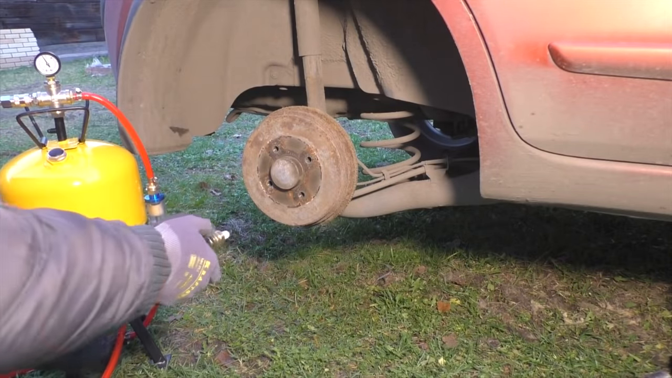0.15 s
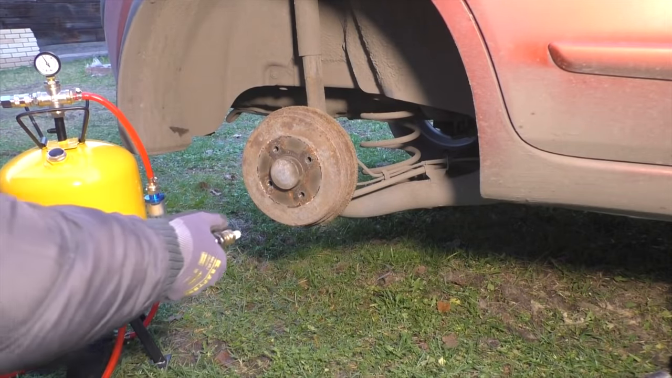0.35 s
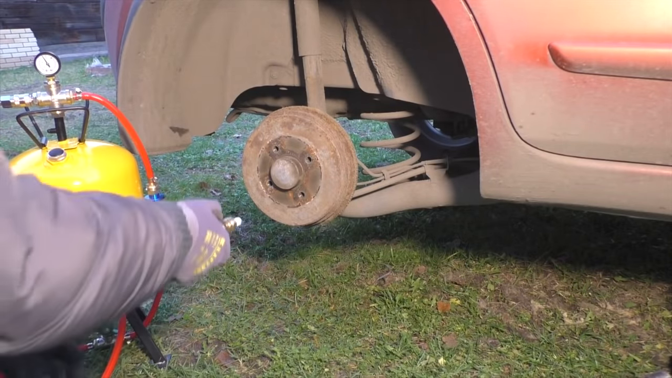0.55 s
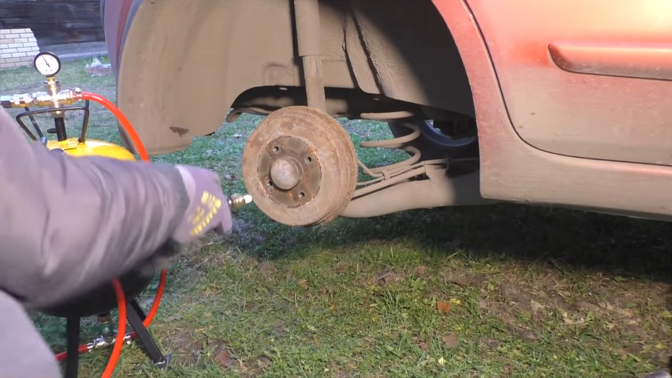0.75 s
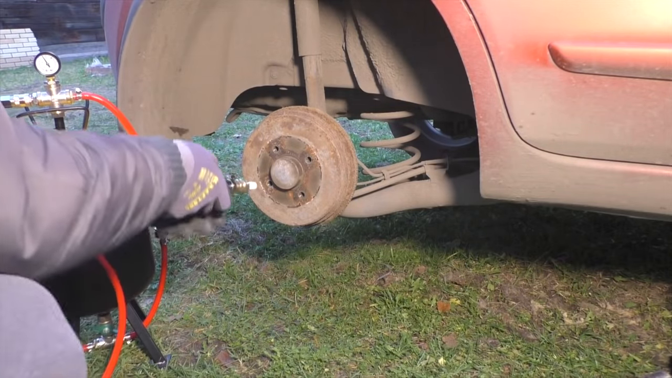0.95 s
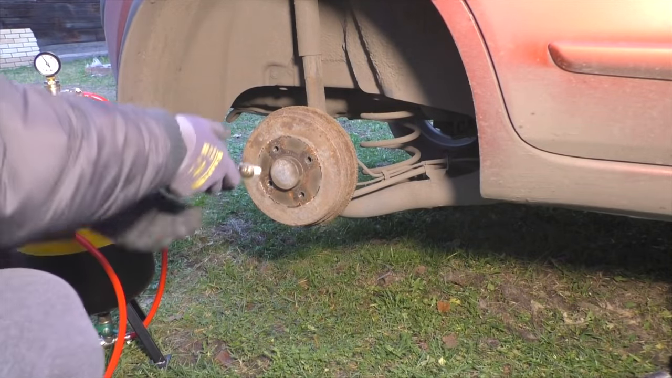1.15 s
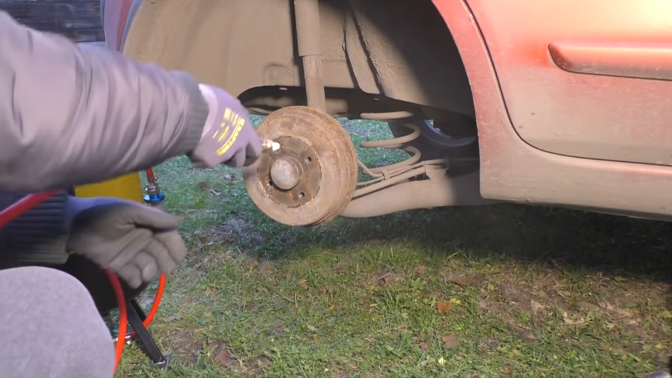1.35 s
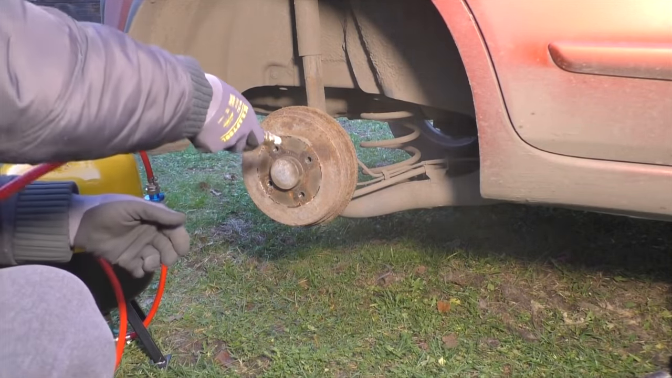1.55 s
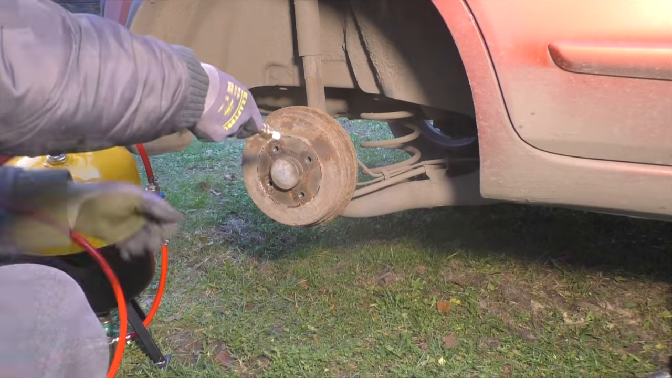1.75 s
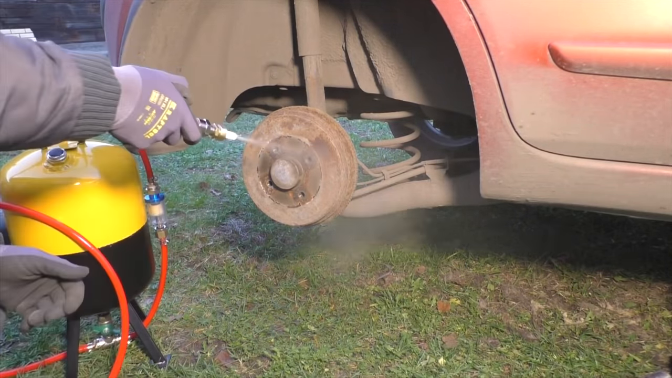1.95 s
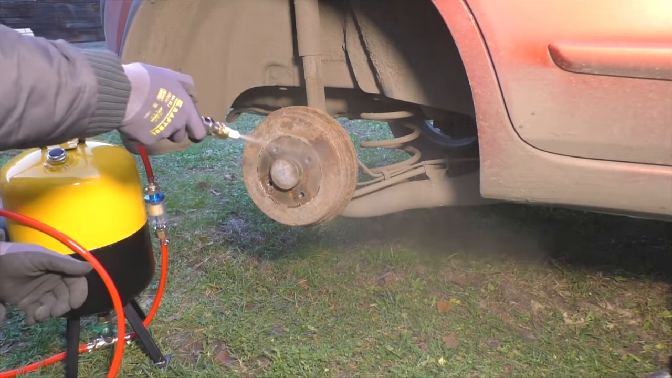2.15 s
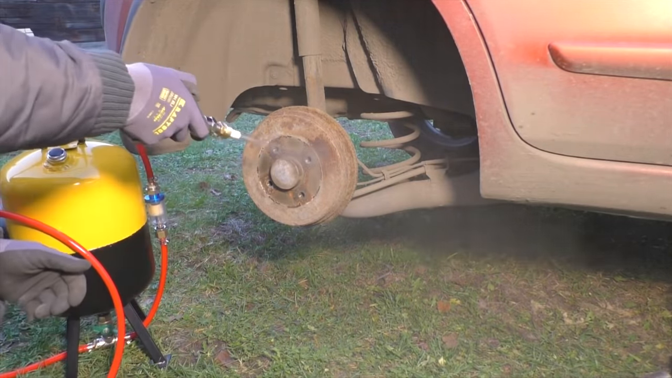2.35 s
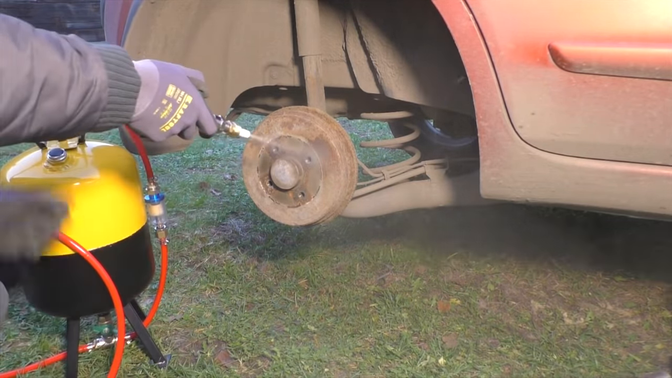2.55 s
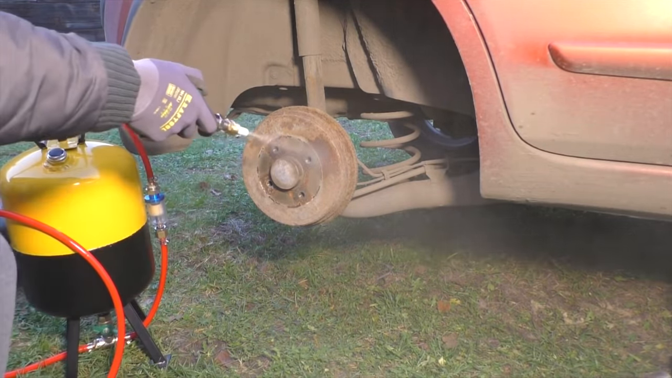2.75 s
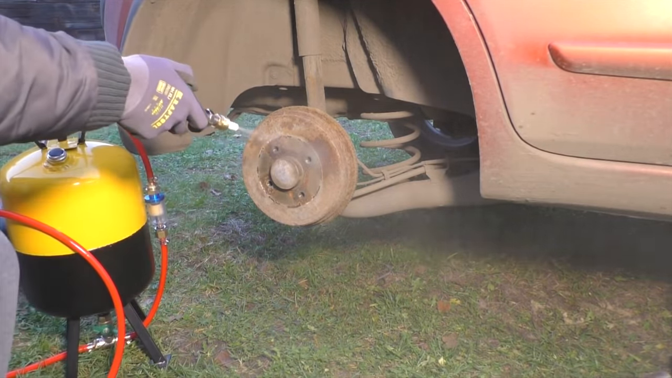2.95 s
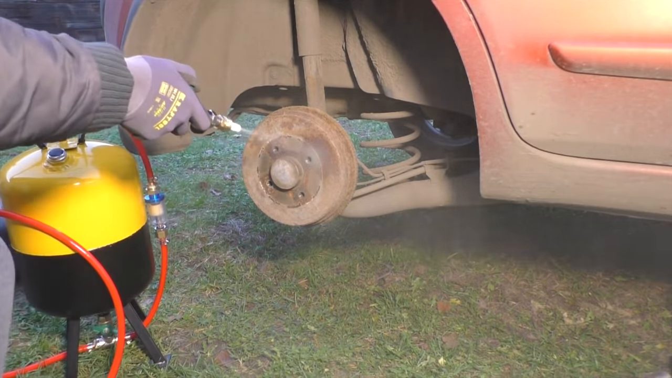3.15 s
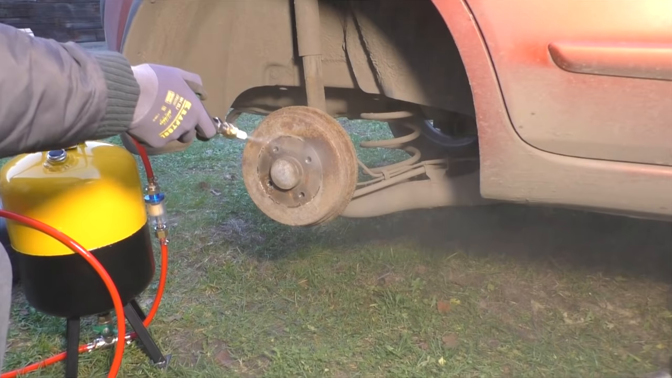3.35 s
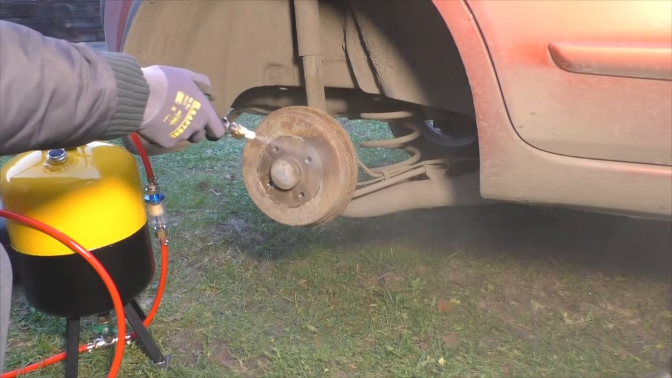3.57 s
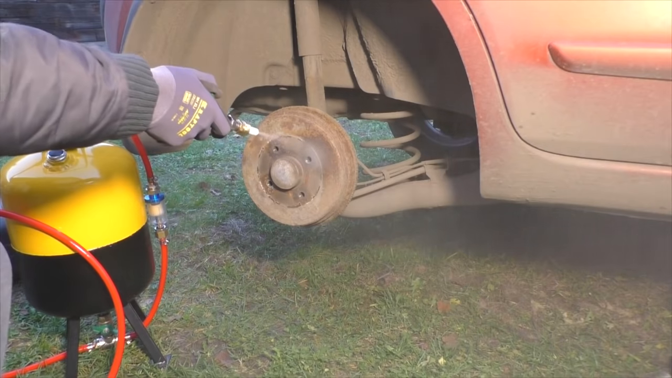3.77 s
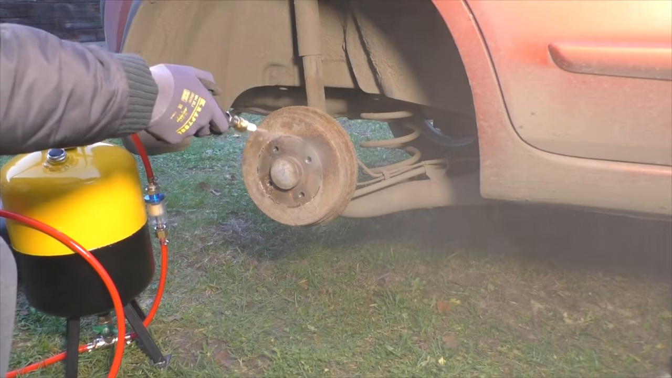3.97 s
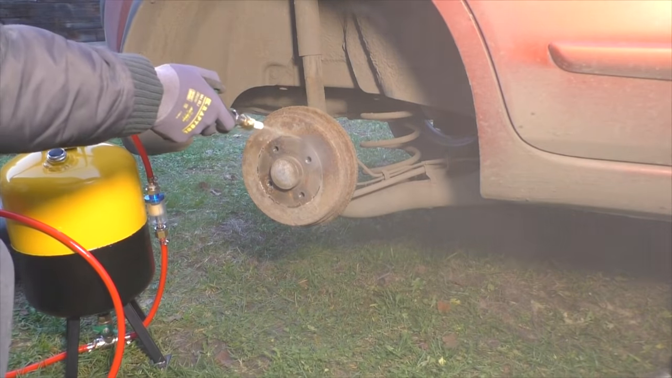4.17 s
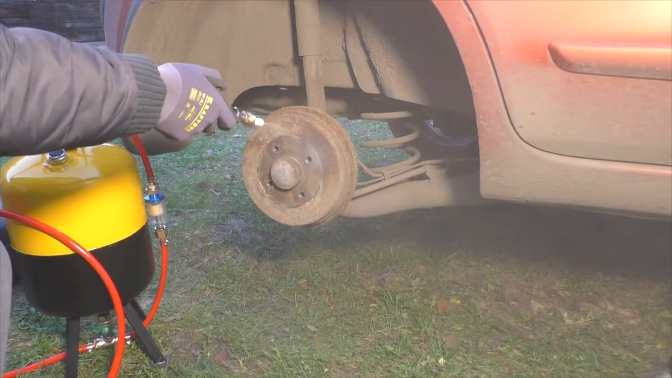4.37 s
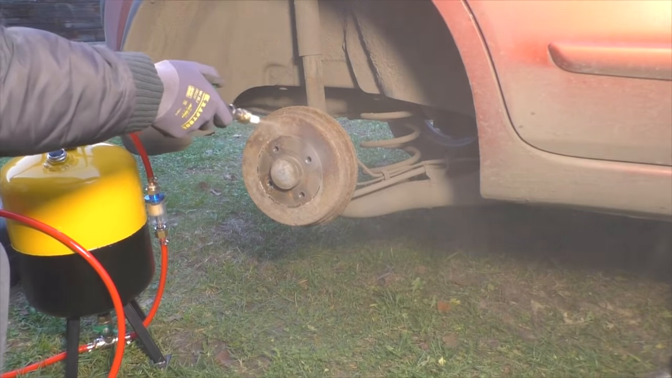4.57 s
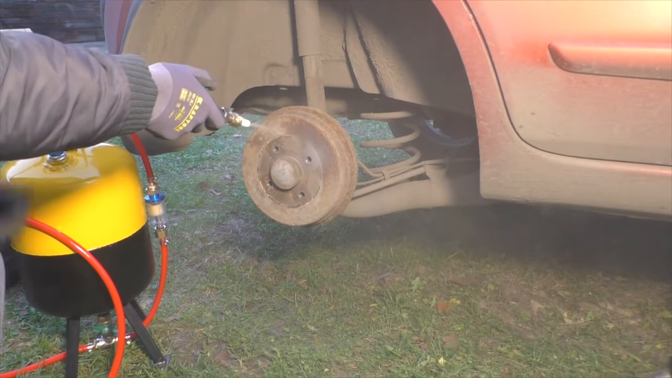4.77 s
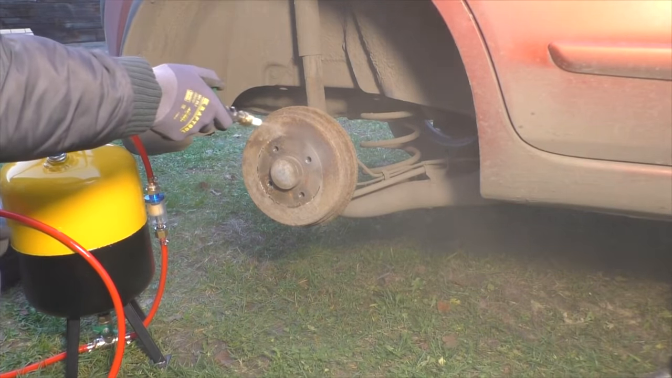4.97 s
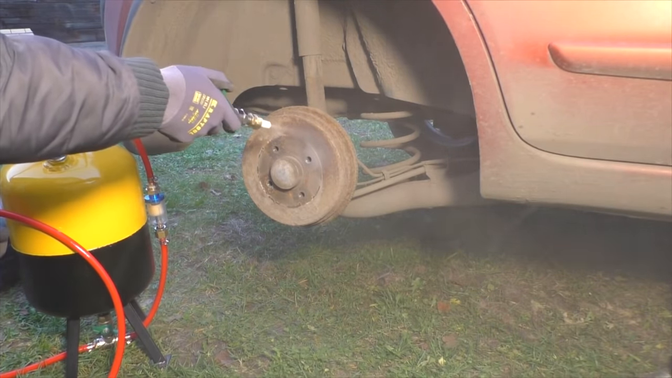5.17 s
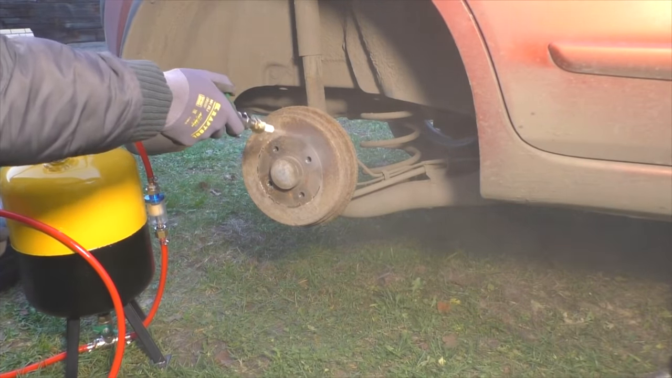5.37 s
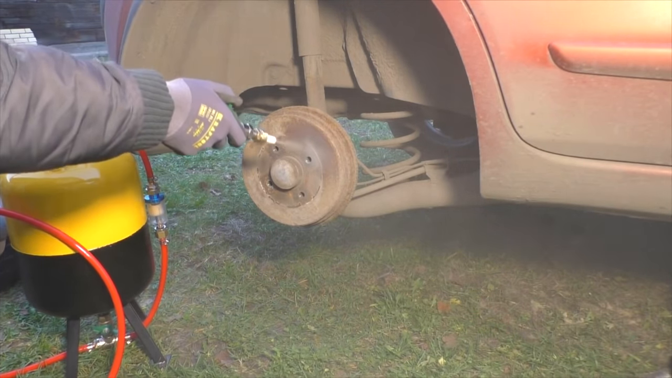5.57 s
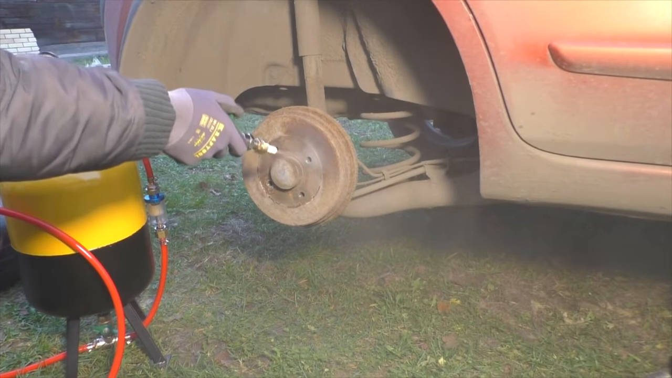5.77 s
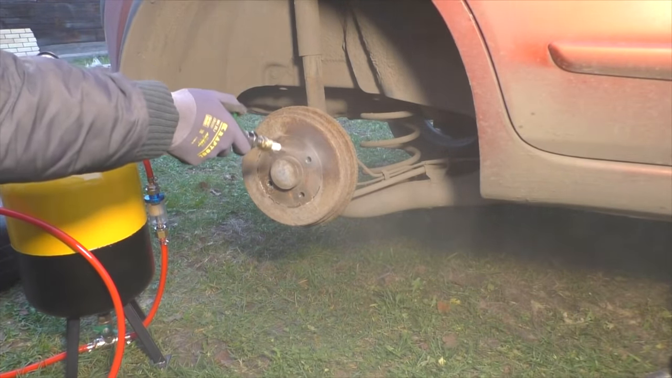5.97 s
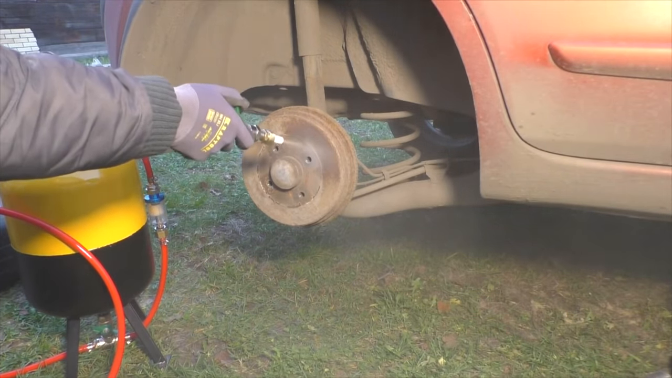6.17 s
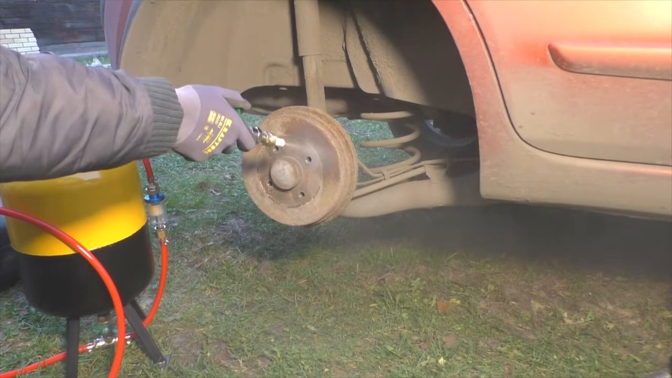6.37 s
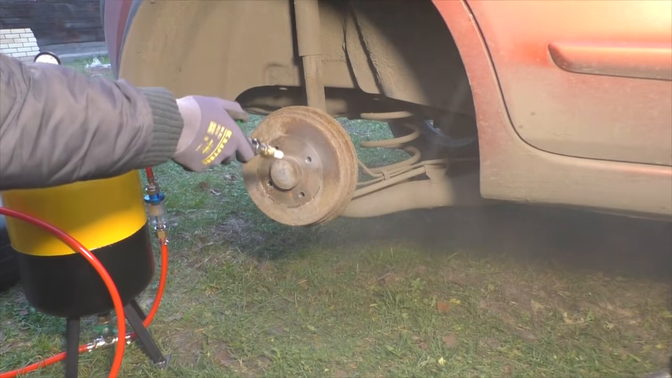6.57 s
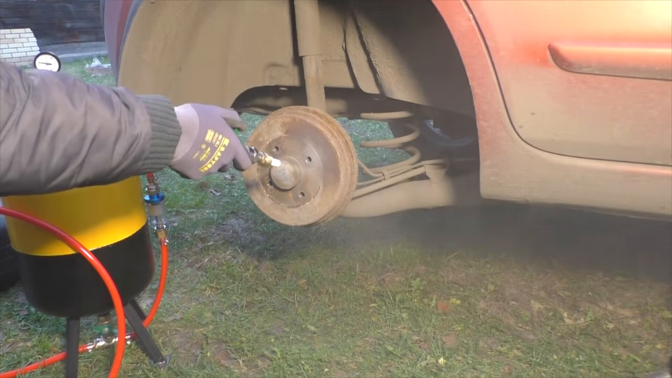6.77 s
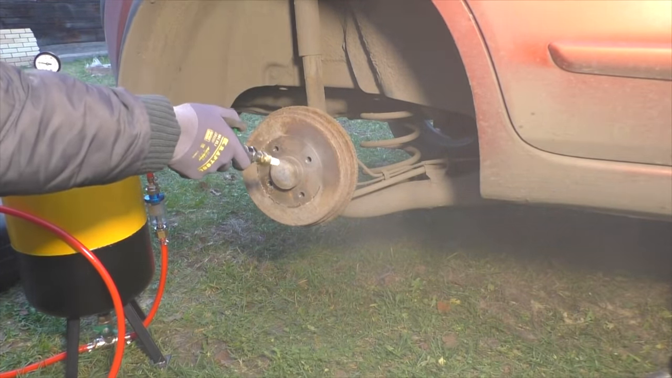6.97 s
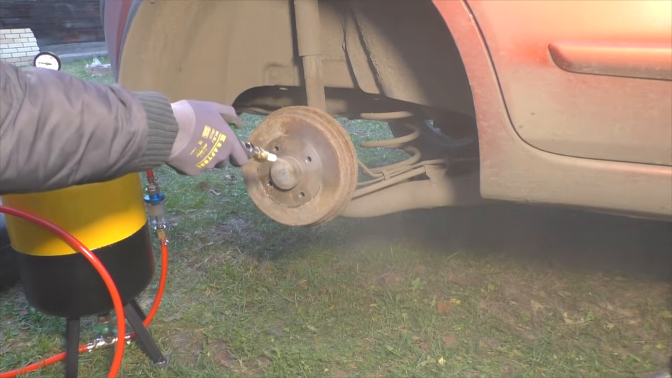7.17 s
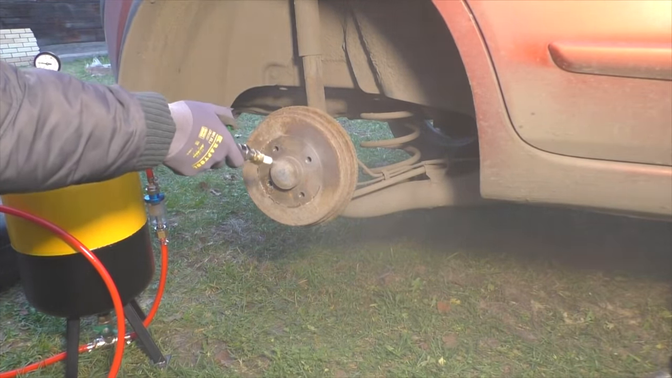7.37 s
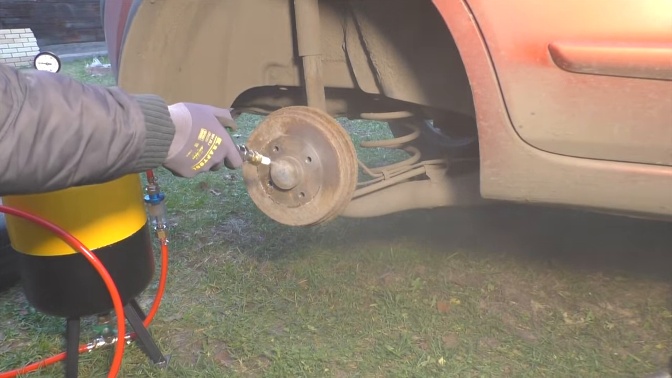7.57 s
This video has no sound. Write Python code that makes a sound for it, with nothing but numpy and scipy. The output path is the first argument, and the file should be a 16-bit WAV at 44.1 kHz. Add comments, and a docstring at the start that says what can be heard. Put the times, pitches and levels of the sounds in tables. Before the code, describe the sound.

Outdoors, close to a car's wheel arch, in stereo. From 0 to 0.87 s it is quiet: a faint steady machine whine around 2 kHz, murmuring air, low rumble, a tiny hiss puff at the start and a small tick near 0.44 s. At about 0.9 s the valve opens with an abrupt loud rush and very short squeals. From 1.0 to 1.7 s nearly bare air shrieks at a piercing 14 to 15 kHz, with brief breaks, sagging and fraying into hiss. Around 1.8 to 2.0 s sand chokes the hose: the blast drops sharply and splutters hollowly. It bursts clear at 2.03 s. Until 7.6 s a dense, gritty hiss and midrange roar flow steadily but unevenly, grains sizzling on the drum, whose metallic ringing strengthens after 4 s. Soft low booms buffet the arch; a small gust swells near 7.3 s. The blast never stops.

```python
"""Outdoors, close to a car's wheel arch: a hand-held sandblaster strips a brake drum before a two-port microphone.
A machine whines faintly over a murmur of air until the valve opens with a rush and short squeals.
Nearly bare air then shrieks at the nozzle as one fraying tone, until a slug of sand chokes the hose.
Once it clears, sand and air hiss on the ringing drum to the end, while the wheel arch booms below.
Filtered noise makes jet, air and resonances; random ticks make the grains; sines make whine and shriek."""
import sys
import numpy as np
from scipy import signal
from scipy.fft import rfft, irfft, next_fast_len
from scipy.io import wavfile
from scipy.ndimage import uniform_filter1d, map_coordinates

SR = 44100
rng = np.random.default_rng(int(sys.argv[2]) if len(sys.argv) > 2 else 0)


def inscribe(sig):
    """Save sig as 16-bit PCM at rate SR to the path in sys.argv[1].

    A 1-D sig is mono; a 2-D sig holds one channel per row.
    Samples are clipped to [-1, 1] before scaling.
    """
    pcm = np.round(np.clip(np.atleast_2d(sig).T, -1, 1) * 32767)
    wavfile.write(sys.argv[1], SR, pcm.astype(np.int16))


N = 336483

# spectrum of the sand's sizzle: f/Hz, relative level/dB
SAND_SPECTRUM = [(4000, -31), (7300, -18), (8400, -4.5), (9600, 0.5), (11500, 0), (12900, -2), (13500, -10),
                 (16000, -12.5)]
# spectrum of the top treble: f/Hz, relative level/dB
FIZZ_SPECTRUM = [(9000, -41), (12000, 0), (13300, -2.5), (14200, 3), (15000, 0), (15800, -1)]
# spectrum of the low rumble and draught: f/Hz, relative level/dB
RUMBLE_SPECTRUM = [(20, -28), (38, -21), (52, 1), (130, 2.5), (170, -3), (230, -6.5), (450, -10.5),
                   (900, -19), (3000, -38)]
# top treble made at the nozzle: t/s, relative level/dB
TREBLE_LEVEL = [(0.91, -26), (0.94, -26), (1.0, -20.5), (1.3, -22), (1.32, -21), (1.36, -18.5), (1.47, -23),
                (1.77, -24.5), (1.81, -37), (1.97, -41), (2.01, -26), (2.16, -20), (2.26, -30),
                (2.39, -20.5), (2.54, -20), (2.59, -27.5), (3.44, -23), (3.64, -30), (3.72, -22.5),
                (4.2, -29.5), (4.35, -27.5), (7.63, -33.5)]
# gusts as a slug clears or the jet catches an edge: t/s, length/s, rise of the roar/dB
ROAR_GUSTS = [(1.36, 0.055, 4), (1.72, 0.16, 2.5), (1.93, 0.096, 11), (2.028, 0.052, 9.5), (2.31, 0.092, 5),
              (2.73, 0.17, 2.5), (7.28, .08, 4.5)]
# how squarely the jet strikes the drum's face: t/s, relative ring level/dB
FACE_LEVEL = [(0.9, -72), (1.55, -38.5), (2.2, -61), (3.3, -65), (4.2, -42.5), (6.6, -39), (7.63, -40.5)]
# likeness of sound from all around at the two microphone ports: f/Hz, likeness (0 to 1)
DIFFUSE_LIKENESS = [(60, 0.91), (150, .7), (350, 0.14), (900, 0.22), (2000, 0.71), (3000, 0.63), (4500, .5),
                    (6000, .25), (9000, .8), (15000, 0.95)]

OPEN_S, OPENING_S = 0.875, 0.034  # the valve starts to open, and takes this long
PLUG_S, CLEAR_S = 1.82, 2.03  # sand plugs the hose, then it clears


def blast():
    """The turbulent jet roars and rings the drum; clumps of sand sizzle on it, and the feed drives them."""
    # flow of sand onto the drum: t/s, sizzle level/dB
    feed = [(0.91, -33), (0.96, -20.5), (1.02, -31), (1.53, -35), (1.77, -29.5), (1.88, -39.5),
            (1.97, -42.5), (2.01, -23.5), (2.05, -25), (2.26, -29.5), (2.37, -23.5), (2.41, -28.5),
            (2.61, -29), (2.72, -24.5), (2.78, -27.5), (2.93, -25), (3.51, -27.5), (3.58, -31.5),
            (3.74, -24), (3.79, -28), (4.03, -27), (4.17, -29.5), (4.35, -26), (6.65, -27), (6.79, -30.5),
            (6.92, -26), (6.97, -32), (7.07, -24), (7.2, -29.5), (7.37, -25), (7.55, -32), (7.63, -29)]
    # turbulent roar of the jet: f/Hz, relative level/dB
    roar_spectrum = [(60, -41), (200, -14), (420, -11), (600, -8.5), (800, -7), (920, -8), (1150, -2.5),
                     (1600, -6), (2000, -1.5), (2700, -1.5), (4000, -2.5), (7000, -27.5)]
    # hiss of the air: f/Hz, relative level/dB
    air_spectrum = [(300, -31), (1500, -12), (3000, -2), (4200, 0.5), (6300, 1.5), (7400, -0.5),
                    (9000, -0.5), (12000, -27), (16000, -43)]
    # resonances of the drum under the grains: f/Hz, width/Hz, relative level/dB
    drum_modes = [(1270, 100, -5.5), (1430, 99, -2.5), (1653, 51, -3.5), (1873, 50, 1), (2180, 36, -1),
                  (2440, 200, -0.5), (3310, 450, -2.5), (5820, 360, -3)]
    # resonances of the drum's face: f/Hz, width/Hz, relative level/dB
    face_modes = [(740, 130, -5.5), (2100, 96, 4.5), (3255, 80, 5.5), (3470, 100, 6), (5660, 240, 3),
                  (9680, 140, -1), (12000, 180, -10), (12950, 200, 2.5)]

    feed_db = curves(feed)[0] + 27  # relative to a reference sizzle of -27 dB
    gust_db = swells(ROAR_GUSTS)
    ring_db = curves(FACE_LEVEL)[0]
    # the roar starts 6 dB weaker and fills out in 0.79 s
    build_db = -6 * (1 - ramp(OPEN_S, 0.79))
    # the pressure behind the valve escapes in a short rush of air
    rush_db = 7 * np.exp(-since(OPEN_S) / 0.032)
    # roar and air follow the feed less than the sand does
    roar_db = -40.5 + 0.49 * feed_db + gust_db + build_db
    air_db = -32 + 0.67 * feed_db + 0.4 * gust_db + rush_db
    sand_db = -26 + feed_db
    # the uneven feed of sand, at slow to fast rates
    clumps = 0.49 * wobble(14) + 0.98 * wobble(35) + 0.9 * wobble(140) + 0.28 * wobble(700)

    roar = amp(roar_db + 1.44 * wobble(25)) * heard(noise(), colour(roar_spectrum))
    drum_grains = impacts(rate=5000, spread_db=6.0)
    drum_db = (roar_db + air_db) / 2 - 7.0 + 0.56 * clumps
    drum = amp(drum_db) * heard(drum_grains, body(drum_modes))
    face_db = ring_db + 2.0 + 0.5 * feed_db + 0.34 * clumps
    face = amp(face_db) * heard(noise(), body(face_modes))
    air = amp(air_db + 0.59 * clumps) * heard(noise(), colour(air_spectrum))
    sand_grains = impacts(rate=20000, spread_db=4.0)
    sand = amp(sand_db + 0.76 * clumps) * heard(sand_grains, colour(SAND_SPECTRUM))
    fizz_share = 1 - whistling()[2]  # a shrieking jet puts its treble into one tone
    fizz_gain = amp(curves(TREBLE_LEVEL)[0] + 0.2 + 1.4 * clumps) * np.sqrt(fizz_share)
    fizz_grains = impacts(rate=18000, spread_db=1.0)
    fizz = fizz_gain * heard(fizz_grains, colour(FIZZ_SPECTRUM))

    hiss = wander(roar + drum + air + sand + fizz, patchy_db=1.7)
    return echoes(hiss + face, strength=0.28, longest=.014, dull_hz=3520)


def impacts(rate, spread_db):
    """Sand grains striking steel: random sharp ticks of unequal size, rate a second."""
    struck = rng.random((2, N)) < rate / SR
    sizes = amp(spread_db * np.clip(noise(), -2, 2))
    return unit(struck * np.sign(noise()) * sizes)


def wander(x, patchy_db):
    """The nozzle drifts in the hand, so narrow bands of the hiss swell and fade."""
    bands = signal.stft(x, nperseg=1024)[2]
    field = rng.standard_normal(bands.shape[1:])
    # smooth over frequency, then over time
    quick = uniform_filter1d(uniform_filter1d(field, size=6, axis=0), size=14, axis=1)
    slow = uniform_filter1d(uniform_filter1d(field[::-1], size=3, axis=0), size=90, axis=1)
    patches_db = patchy_db * unit(unit(quick) + unit(slow))
    return signal.istft(bands * amp(patches_db), nperseg=1024)[1][:, :N]


def echoes(x, strength, longest, dull_hz, count=12):
    """Weak, dull reflections off the wheel arch and car body ripple the low spectrum."""
    delays = longest * (np.arange(count) + rng.uniform(.5, 1, count)) / count  # seconds
    gains = strength * rng.choice([-1, 1], count) / np.sqrt(count)
    copies = np.zeros_like(x)
    for delay, gain in zip(delays, gains):
        copies += gain * np.pad(x, ((0, 0), (int(delay * SR), 0)))[:, :N]
    return x + filtered(copies, lambda hz: 1 / (1 + (hz / dull_hz) ** 2))


def shriek():
    """With little sand in it the jet locks into a shrill tone, which frays as sand arrives."""
    # the tone breaks off briefly: t/s, length/s, change/dB
    breaks = [(1.225, .022, -5), (1.312, 0.032, -15), (1.417, 0.041, -8), (1.582, 0.043, -7),
              (1.68, .03, -3)]
    hz, rough, share = whistling()
    breaks_db = np.zeros(N)
    for start, length, db in breaks:  # it fades out, then snaps back in 3 ms
        breaks_db += db * ramp(start, length / 2) * (1 - ramp(start + length, .003))
    flutter_db = 1.1 * wobble(30.4) + 1.4 * wobble(110) + 4.2 * rough * wobble(900)
    jitter_hz = rough * (600 * wobble(1800) + 130 * wobble(120))
    phase = 2 * np.pi * np.cumsum(hz + jitter_hz) / SR
    level_db = curves(TREBLE_LEVEL)[0] + breaks_db + flutter_db + 1.5
    return amp(level_db) * np.sqrt(2 * share) * np.sin(phase)


def whistling():
    """The shriek's pitch, its roughness (which grows as the pitch sags) and its share of the top treble."""
    # pitch of the tone: t/s, f/Hz
    pitch = [(0.94, 12400), (0.975, 12970), (1.02, 14660), (1.29, 14600), (1.66, 14200), (1.79, 12500)]
    pure_hz, fray_hz, least_rough = 14800, 806, .13  # purest pitch, and the scale of the fraying around it
    hz, = curves(pitch)
    rough = np.clip(least_rough + ((pure_hz - hz) / fray_hz) ** 2, 0, 1)
    # the shriek sets in, then dissolves into hiss
    locked = ramp(0.92, .04) * (1 - ramp(1.6, .21))
    share = locked * np.clip(1.1 - 0.55 * rough, 0, .985)
    return hz, rough, share


def squeals():
    """As the jet starts or catches an edge, narrow bands of turbulence swell and fade."""
    # short squeals: t/s, f/Hz, width/Hz, length/s, level/dB
    squeal_rows = [(0.914, 3395, 1000, .018, -31.5), (0.922, 7470, 350, .006, -22),
                   (0.911, 12650, 400, .009, -21), (0.916, 8640, 398, 0.012, -25),
                   (0.937, 10000, 600, .007, -23), (0.958, 11900, 1300, .014, -26),
                   (0.964, 8600, 703, 0.016, -31), (0.987, 6230, 592, .03, -34.5),
                   (2.27, 2345, 258, 0.033, -40), (2.708, 2345, 320, 0.05, -39)]
    t = np.arange(N) / SR
    out = np.zeros(N)
    for start, hz, width_hz, length, db in squeal_rows:
        near = np.abs(t - start) < 4 * length
        u = t[near] - start
        knots = rng.standard_normal((2, int(8 * length * width_hz) + 4))
        a, b = (map_coordinates(k, [(u - u[0]) * width_hz]) for k in knots)
        band = a * np.sin(2 * np.pi * hz * u) + b * np.cos(2 * np.pi * hz * u)
        out[near] += amp(db) * np.exp(-(u / length) ** 2 / 2) * band
    return out


def choke():
    """Air seeps, then slugs of sand splutter through the hose and ring its air column."""
    # spurts of air and sand: t/s, rise/s, fall/s, level/dB
    spurts = [(.444, .002, .006, -51), (.835, .07, 0.0074, -54), (.912, .01, .05, -45),
              (1.875, 0.042, 0.02, -29), (1.94, 0.038, 0.049, -40), (2.0, .009, 0.015, -25)]
    # resonances of the hose: f/Hz, width/Hz, relative level/dB
    hose_modes = [(1200, 120, -9), (2370, 280, -4.5), (3170, 160, 4.5), (3530, 110, 6), (8350, 600, -5)]
    t = np.arange(N) / SR
    level = np.zeros(N)
    for peak, rise, fall, db in spurts:
        level += amp(db) * np.exp(-np.maximum((peak - t) / rise, (t - peak) / fall))
    return level * amp(1.0 * wobble(120)) * heard(noise(), body(hose_modes))


def arch():
    """The deflected jet buffets the wheel arch's hollow; body panels shake harder as the choke sets in and clears."""
    # the jet's push on the arch: t/s, relative boom level/dB
    boom_level = [(0.93, -50.5), (1.15, -59), (1.32, -47.5), (1.47, -57.5), (1.81, -50.5), (1.99, -76),
                  (2.07, -46.5), (2.5, -41.5), (2.74, -62), (2.8, -46), (2.87, -54), (2.98, -41.5),
                  (3.09, -49), (3.39, -42.5), (3.6, -53.5), (4.06, -44.5), (4.29, -53), (4.33, -42),
                  (4.49, -50), (4.59, -45.5), (4.7, -50.5), (4.77, -43.5), (5.13, -49), (6.71, -55),
                  (7.01, -64), (7.11, -48), (7.2, -62), (7.31, -50), (7.61, -48.5), (7.63, -56)]
    # resonances of the hollow: f/Hz, width/Hz, relative level/dB
    arch_modes = [(278, 54, -7.5), (335, 31, 1), (510, 61, -10), (645, 33, -9.5), (777, 190, -18)]
    # low panel resonances of the car body: f/Hz, width/Hz, relative level/dB
    panel_modes = [(118, 39, -6.5), (186, 33, 0), (215, 20, 3)]
    # the push is uneven, and gusts raise it a little
    boom_db = curves(boom_level)[0] - .8 + 0.15 * swells(ROAR_GUSTS) + 1 * wobble(9)
    boom = amp(boom_db) * heard(noise(), body(arch_modes))
    panels = amp(-69.5 + 9 * ramp(PLUG_S, .22)) * heard(noise(), body(panel_modes))
    # air thrown back by the drum's face
    draught = amp(curves(FACE_LEVEL)[0] - 32.5) * heard(noise(), colour(RUMBLE_SPECTRUM))
    return ramp(OPEN_S, .06) * (boom + panels + draught)


def background():
    """The rumble, and a whining machine, murmuring air and soft hiss heard only before the blast."""
    # the machine's steady tones: f/Hz, relative level/dB
    whine_tones = [(732.1, -73), (1513, -63.5), (1561, -74), (1803, -63), (1852, -70), (1997, -68),
                   (2046, -50.5), (2390, -70), (3165, -68)]
    # resonances of the machine's casing: f/Hz, width/Hz, relative level/dB
    casing_modes = [(1510, 65, -3), (3130, 91, 0), (5800, 300, -9)]
    # spectrum of the air's murmur: f/Hz, relative level/dB
    murmur_spectrum = [(200, -14), (800, -11), (1100, 0), (1900, 2.5), (3100, -2.5), (4400, -7.5),
                       (5900, -9), (7200, -14), (16000, -15)]
    # the murmur before the blast: t/s, relative level/dB
    murmur_level = [(0, -50), (.25, -56), (.5, -51), (.7, -51.5), (.79, -46.5), (.85, -46.5), (.9, -56)]
    # dip just before the valve opens: t/s, length/s, change/dB
    dip = [(.858, 0.012, -8)]

    t = np.arange(N) / SR
    whine_db, = curves([(0, 3), (0.6, 0), (0.84, 0), (0.86, -7)])
    turn = 0.87 * np.array([[.5], [-.5]])  # radians between the ports
    whine = np.zeros((2, N))
    for hz, db in whine_tones:
        whine += amp(db) * np.sqrt(2) * np.sin(2 * np.pi * hz * t + turn + .15 * wobble(12))
    breath = heard(noise(), colour(murmur_spectrum), DIFFUSE_LIKENESS)
    casing = heard(noise(), body(casing_modes), DIFFUSE_LIKENESS)
    murmur = amp(curves(murmur_level)[0] + 2.0) * (breath + amp(-14) * casing)
    thin = heard(noise(), colour(SAND_SPECTRUM), DIFFUSE_LIKENESS)
    thin += amp(-5) * heard(noise(), colour(FIZZ_SPECTRUM), DIFFUSE_LIKENESS)
    # a puff at the very start decays to a steady thin hiss
    hiss = (amp(-65.5) + amp(-47) * np.exp(-t / .035)) * thin
    before = 1 - ramp(OPEN_S + OPENING_S, 0.04)
    return amp(swells(dip)) * (before * (amp(whine_db) * whine + murmur + hiss) + rumble())


def rumble():
    """A low rumble from all around that stands out only while the jet is off or choked."""
    off = 1 - ramp(OPEN_S, 0.069)
    plugged = ramp(PLUG_S, .04) * (1 - ramp(CLEAR_S, .04))
    off_db = -50.5 + 4 * (1 - ramp(.05, 0.18))  # a little stronger at first
    gain = amp(off_db) * off + amp(-52.5) * plugged + amp(-89)
    return gain * heard(noise(), colour(RUMBLE_SPECTRUM), DIFFUSE_LIKENESS)


def heard(pair, response, likeness=None):
    """Colour two unrelated signals and mix them into the two microphone ports, at rms 1."""
    # likeness of close sound at the two ports: f/Hz, likeness (0 to 1)
    close_likeness = [(60, 0.69), (200, 0.99), (1200, 0.96), (3000, 1), (4000, 0.68), (5900, 0.68),
                      (6800, 0.54), (8000, 0.78), (9300, 0.85), (12000, 1), (15000, 1)]
    if likeness is None:
        likeness = close_likeness

    def split(hz):
        turn = np.arccos(np.clip(along(likeness, hz), -1, 1)) / 2
        return response(hz) * np.array([np.cos(turn), np.sin(turn)])
    mid, side = filtered(pair, split)
    return unit(np.array([mid + side, mid - side]))


def body(modes):
    """The response of a set of resonances, as band-pass modes of alternating sign."""
    def response(f):
        total = 0
        for k, (centre, width, db) in enumerate(modes):
            damping = 1j * f * width
            total = total + (-1) ** k * amp(db) * damping / (centre * centre - f * f + damping)
        return total
    return response


def colour(points):
    """The response of a smooth spectrum."""
    return lambda hz: amp(along(points, hz))


def filtered(x, response):
    """x times a complex response of frequency."""
    m = next_fast_len(N + 8192)
    return irfft(rfft(x, m) * response(np.fft.rfftfreq(m, 1 / SR)), m)[..., :N]


def noise():
    """Two unrelated white noises."""
    return rng.standard_normal((2, N))


def wobble(rate):
    """A smooth random curve, rate knots a second."""
    knots = rng.standard_normal(int(N * rate / SR) + 4)
    return map_coordinates(knots, [np.arange(N) * rate / SR])


def curves(rows):
    """One value per sample for each column after the time."""
    s, *cols = np.transpose(rows)
    return [np.interp(np.arange(N) / SR, s, c) for c in cols]


def swells(rows):
    """Rounded rises or dips in dB; length is the width at half the dB."""
    t = np.arange(N) / SR
    return sum(db * np.exp2(-np.abs(2 * (t - s) / length) ** 3) for s, length, db in rows)


def ramp(start, length):
    """Rises from 0 to 1 over length seconds."""
    return np.clip((np.arange(N) / SR - start) / length, 0, 1)


def since(start):
    """Seconds since start, 0 before it."""
    return np.maximum(np.arange(N) / SR - start, 0)


def along(points, hz):
    """(f/Hz, value) points interpolated on a log frequency axis."""
    f, v = np.transpose(points)
    return np.interp(np.log(hz + 1), np.log(f + 1), v)


def amp(db):
    """Decibels to gain."""
    return 10 ** (np.asarray(db) / 20)


def unit(x):
    """Scale to rms 1."""
    return x / np.sqrt(np.mean(x ** 2) + 1e-20)


def scene():
    """The close jet, placed between the ports by level and phase at each frequency, over the background."""
    # left over right port: f/Hz, level/dB
    balance = [(90, 0), (330, -4.5), (700, -3.5), (1800, -1), (3000, -1), (4200, -2.5), (7200, -7.5),
               (9300, -2.5), (10800, -2.2), (11700, -1.5), (13300, 2.5), (14200, -4.5), (15500, 0)]
    # lead of the left port: f/Hz, phase/rad
    lead = [(3000, -0.047), (4500, -0.25), (6200, -1.05), (7400, 0.92), (9300, 0)]

    def ports(hz):
        half = amp(along(balance, hz) / 2) * np.exp(.5j * along(lead, hz))
        return np.array([half, 1 / half])
    valve = ramp(OPEN_S, OPENING_S) ** 2
    jet = valve * (blast() + squeals()) + choke() + arch() + shriek()
    return filtered(jet, ports) + background()


def record(dry):
    """The microphone's chain passes nothing from its band limit of 15760 Hz upward."""
    return filtered(dry, lambda hz: hz < 15760)


dry = scene()
out = record(dry)
inscribe(out)
```